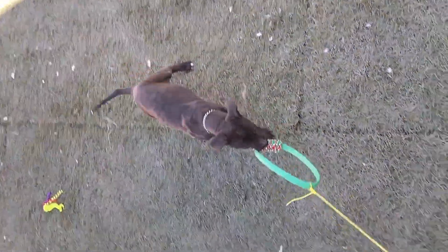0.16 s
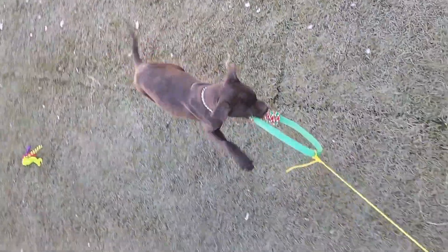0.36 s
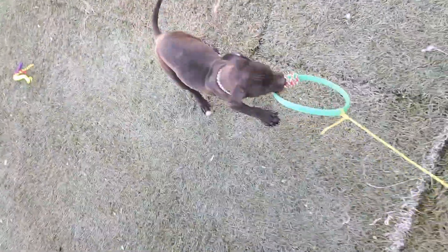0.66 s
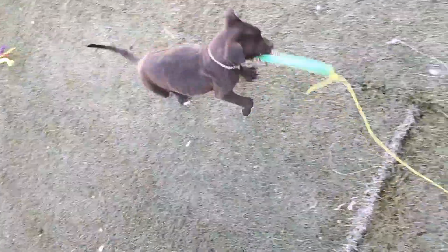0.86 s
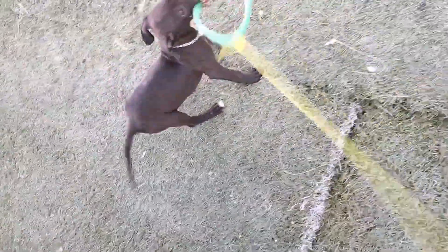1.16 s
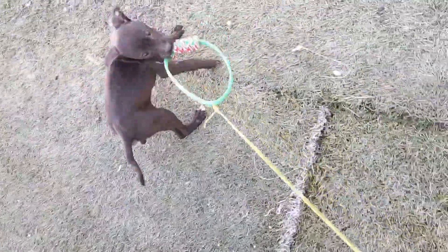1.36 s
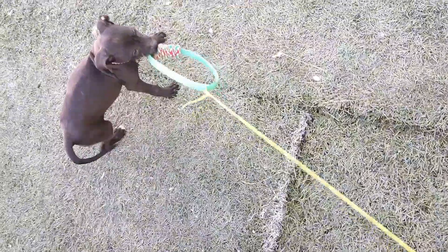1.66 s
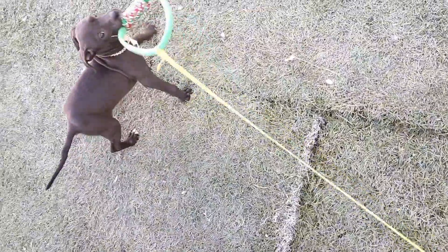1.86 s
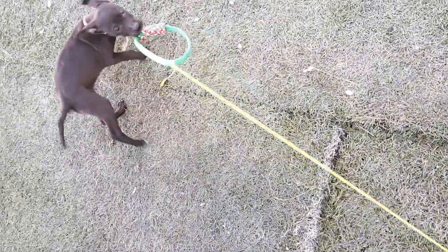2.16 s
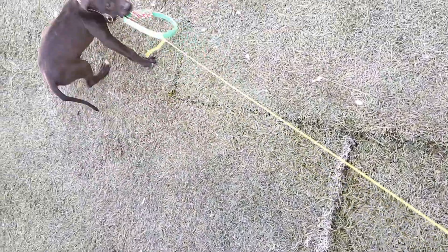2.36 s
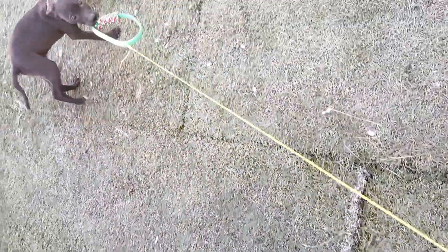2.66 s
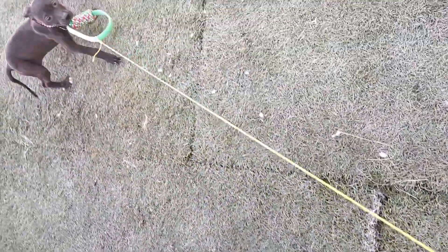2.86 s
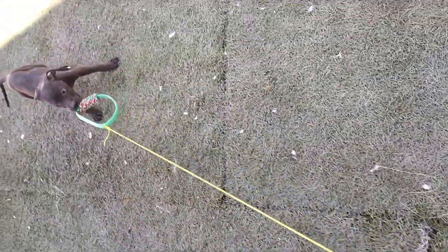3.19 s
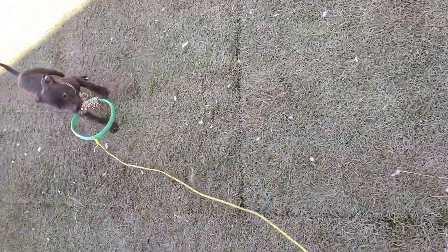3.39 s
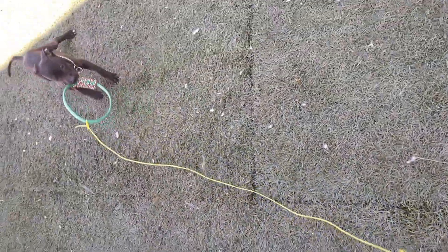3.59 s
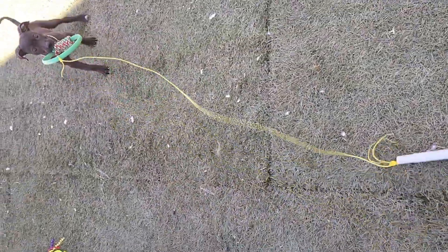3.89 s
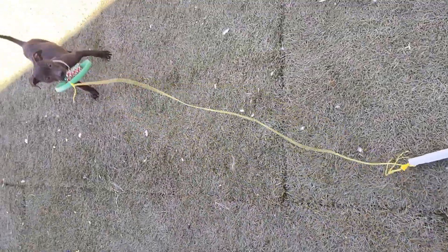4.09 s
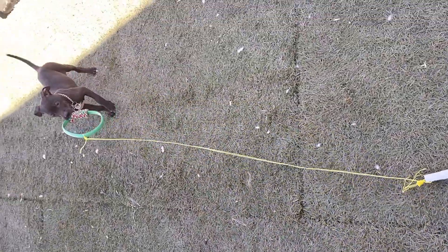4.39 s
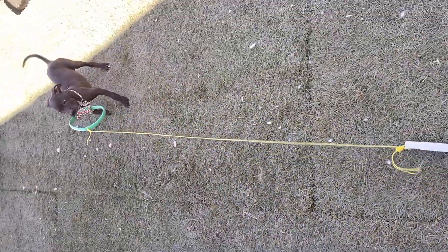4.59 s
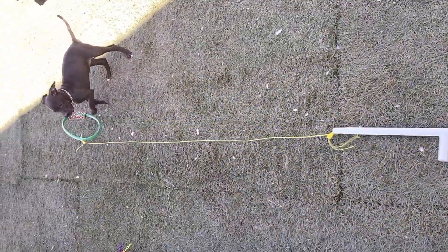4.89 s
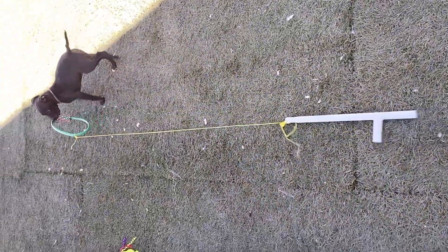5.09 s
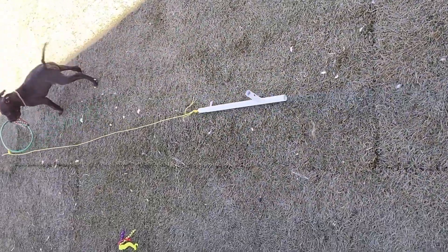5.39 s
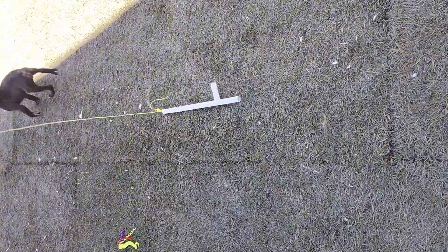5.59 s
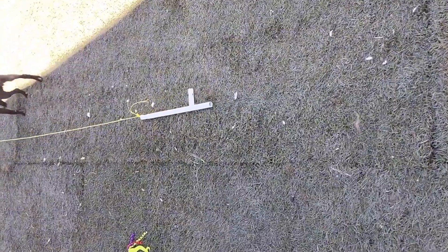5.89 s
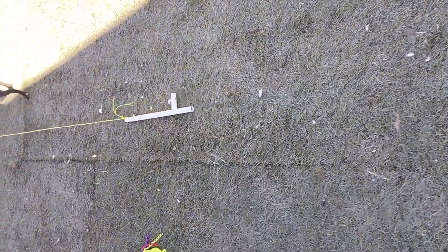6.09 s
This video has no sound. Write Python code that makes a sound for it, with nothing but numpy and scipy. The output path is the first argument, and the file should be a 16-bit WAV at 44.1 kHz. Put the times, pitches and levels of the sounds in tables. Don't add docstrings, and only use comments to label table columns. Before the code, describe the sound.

A dog scuffs dry turf over far traffic; a hollow handle drops with ringing clinks, then scrapes lightly along while a motor rises and nears.

```python
import sys
import numpy as np
from scipy import signal
from scipy.fft import rfft, irfft, next_fast_len
from scipy.io import wavfile
from scipy.ndimage import uniform_filter1d, map_coordinates

SR = 44100
rng = np.random.default_rng(int(sys.argv[2]) if len(sys.argv) > 2 else 0)


def gain_from_db(level_db):
    decades = np.asarray(level_db, float) / 20
    return 10 ** decades


def generate_wav(signal):
    frames = np.transpose(np.atleast_2d(signal))
    scaled = np.clip(frames, -1, 1) * 32767
    pcm = np.round(scaled).astype(np.int16)
    wavfile.write(sys.argv[1], SR, pcm)


N = 275623

# [f/Hz, likeness (1 = same)]
ALIKE = [(60, 0.98), (130, 1), (290, 0.78), (640, 0.36), (1410, -0.063), (3100, -0.027), (6820, -0.27),
         (15000, -1.5)]
# [f/Hz, level/dB per Hz]
JINGLE = [(8600, -59), (9000, -6.5), (11200, -3), (11650, -16.5), (12100, -5.5), (14500, -7), (15700, -12)]
RATTLE_DB = 2.5


def unit(x):
    return x / np.sqrt(np.mean(x ** 2) + 1e-20)


def along(points, hz):
    f, v = np.transpose(points)
    return np.interp(np.log(hz + 1), np.log(f + 1), v)


def curves(rows):
    s, *cols = np.transpose(rows)
    return [np.interp(np.arange(N) / SR, s, c) for c in cols]


def sounding(rows, fade=0.094):
    t = np.arange(N) / SR
    outside = np.minimum(t - rows[0][0], rows[-1][0] - t)
    return np.clip(1 + outside / fade, 0, 1)


def wobble(rate):
    knots = rng.standard_normal(int(N * rate / SR) + 4)
    return map_coordinates(knots, [np.arange(N) * rate / SR])


def filtered(x, response):
    m = next_fast_len(N + SR // 2)
    return irfft(rfft(x, m) * response(np.fft.rfftfreq(m, 1 / SR)), m)[..., :N]


def placed(x, pan_db):
    return np.array([x * gain_from_db(pan_db / 2), x * gain_from_db(-pan_db / 2)])


def rush(spectrum, alike, patchy_db):
    z = signal.stft(rng.standard_normal((2, N)), nperseg=512)[2]
    patches = uniform_filter1d(rng.standard_normal(z.shape[1:]), size=6, axis=0)
    patches = uniform_filter1d(patches, size=12, axis=1)
    pair = signal.istft(z * gain_from_db(patchy_db * unit(patches)), nperseg=512)[1][:, :N]

    def middle_and_side(hz):
        turn = np.arccos(np.clip(along(alike, hz), -1, 1)) / 2
        return gain_from_db(along(spectrum, hz)) * [np.cos(turn), np.sin(turn)]

    mid, side = filtered(pair, middle_and_side)
    return unit(np.array([mid + side, mid - side]))


def tone(hz, db, shake, flutter_db):
    phase = 2 * np.pi * (np.cumsum(hz) / SR + rng.random()) + shake * wobble(12)
    ears = np.array([wobble(4), wobble(4)]) * np.mean(hz) / 650
    return np.sqrt(2) * gain_from_db(db + flutter_db * wobble(9)) * np.sin(phase + ears)


def strokes(rows):
    s, db, rise, fall = np.transpose(rows)[..., None]
    late = np.arange(N) / SR - s
    away = np.maximum(-late / abs(rise), late / abs(fall))
    return np.max(db - 18 * away ** 1.46, axis=0)


def yard(x):
    # [f/Hz, time/s]
    echo_t60 = [(200, 0.24), (3000, 1), (12000, 0.047)]
    hz, t, z = signal.stft(rng.standard_normal((2, SR // 2)), SR, nperseg=256)
    tail = signal.istft(z * gain_from_db(-60 * t / along(echo_t60, hz)[:, None]), SR, nperseg=256)[1]
    late = np.pad(x, ((0, 0), (300, 0)))
    return signal.fftconvolve(late, tail / np.linalg.norm(tail[0]), axes=1)[:, :N]


def hiss():
    # [f/Hz, level/dB per Hz]
    hiss_colour = [(3000, -30), (5000, -1), (7800, -2), (8500, -5), (15700, -4)]
    return gain_from_db(-88.5) * rush(hiss_colour, [(5000, 0)], patchy_db=1.5)


def exhaust(hz, db, overtone_db):
    base = tone(hz, db, shake=.15, flutter_db=.8)
    return base + tone(2 * hz, db + overtone_db, shake=.3, flutter_db=2.5)


def traffic():
    # [t/s, f/Hz, level/dB]
    passing = [
        (1.45, 123.2, -55.5),
        (1.638, 125.4, -35),
        (2.024, 136.3, -40),
        (2.188, 138.3, -33.5),
        (2.36, 131, -33.5),
        (2.52, 130.6, -39.5),
        (2.916, 127.9, -37.5),
        (3.1, 129, -58.5),
    ]
    # [t/s, length/s, first f/Hz, last f/Hz, level/dB]
    drone_rows = [(-.3, .82, 65, 65.4, -32), (.42, .42, 65.4, 64, -41), (.66, .2, 76, 79, -38),
                  (.85, .25, 67.5, 67, -35), (1.85, 1.1, 64, 65.6, -41), (1.05, .4, 79, 77, -42),
                  (1.28, 1.66, 53.2, 53, -35.5), (2.9, .68, 53.5, 54, -40), (3.56, .78, 54.5, 55.9, -44),
                  (4.3, 1.1, 55.8, 55.9, -42), (5.45, .9, 55, 53, -43), (.2, .3, 149, 156, -49),
                  (.5, .66, 159, 163.5, -40.5), (.9, .17, 101, 104, -37), (1.0, .28, 116, 118, -38),
                  (.03, .4, 127, 130, -46), (1.45, .3, 76, 77, -42), (1.95, .45, 85.5, 85.6, -44),
                  (3.15, .25, 114, 116, -43), (3.52, .28, 116, 117, -39), (1.1, .22, 55, 54, -40),
                  (4.2, .25, 139, 143, -42), (2.95, .3, 66, 68, -44), (.08, .45, 198, 196, -52),
                  (2.15, 1.2, 228, 217, -54), (3.7, .17, 140, 146, -40), (1.055, .05, 660, 570, -50)]
    # [t/s, level/dB]
    road = [(0.0, -50.5), (1.1, -50), (3.24, -52.5), (4.09, -51.5), (5.2, -48.5), (6.25, -48.5)]
    # [f/Hz, level/dB per Hz]
    rumble_colour = [(15, -51), (28, 10), (40, 18.5), (70, 13), (110, 17.5), (160, 11), (220, 5.5),
                     (350, -19.5), (600, -52.5)]
    # [f/Hz, level/dB per Hz]
    roar_colour = [(150, -11), (250, -6), (340, -11), (430, -8), (560, -10.5), (720, -7.5), (1200, -11.5),
                   (1800, -18), (2500, -28), (3500, -40.5), (5000, -49.5), (8000, -66), (12000, -120)]
    # [f/Hz, left minus right/dB]
    lean_points = [(40, 1), (70, -0.5), (150, -1.4), (380, 1), (950, -2.5), (2400, -0.5), (6000, 3.5)]

    rev_hz, rev_db = curves(passing)
    overtone_db = -19.5 + .8 * (rev_hz - 137)
    drones = sounding(passing) * exhaust(rev_hz, rev_db, overtone_db)
    for s, length, first_hz, last_hz, db in drone_rows:
        done = np.clip((np.arange(N) / SR - s) / length, 0, 1)
        swell = np.abs(np.sin(np.pi * done)) ** 0.47 * (done < 1)
        hz = first_hz + (last_hz - first_hz) * done
        drones = drones + swell * exhaust(hz, db + 0.1, overtone_db=-32)

    road_db = curves(road)[0]
    rumble = gain_from_db(road_db + 10.5 + 0.14 * wobble(4.7)) * rush(rumble_colour, ALIKE, patchy_db=2.5)
    roar = gain_from_db(road_db + 3.5 + 0.47 * wobble(6.4)) * rush(roar_colour, ALIKE, patchy_db=0.5)

    def lean(hz):
        return gain_from_db(along(lean_points, hz) / 2 * np.array([[1], [-1]]))

    return filtered(drones + rumble + roar, lean)


def paw_side(db):
    return np.clip(-.6 * (db + 87.5), -12, 4)


def paws():
    # [peak t/s, level/dB, rise/s, fall/s]
    scuffs = [(0.127, -77.5, 0.024, 0.017), (.384, -80, 0.18, 0.19), (0.556, -72.5, 0.036, 0.097),
              (.67, -76.5, .08, 0.079), (.86, -79.5, 0.24, 0.13), (.95, -74.5, 0.085, .1),
              (1.015, -69, 0.21, 0.12), (1.104, -74, 0.01, 0.098), (1.2, -82, 0.11, 0.29),
              (1.64, -82, 0.05, 0.066), (1.975, -82, 0.017, .06), (2.129, -82.5, 0.043, 0.14),
              (2.22, -82, 0.059, 0.029), (2.35, -87, 0.065, 0.015), (2.438, -85, .02, 0.47),
              (2.886, -90.5, 0.011, .1), (3.122, -85.5, 0.076, 0.034), (3.375, -78.5, 0.045, 0.034),
              (3.47, -89.5, 0.051, .04), (2.69, -86, 0.064, 0.043), (4.67, -73.5, 0.057, 0.054),
              (4.85, -82.5, 0.3, 0.023), (5.854, -74, .18, 0.25), (6.2, -76, 0.34, 0.34)]
    # [f/Hz, level/dB per Hz]
    near_colour = [(900, -27), (1800, -1), (2500, -6), (3200, -16), (4200, -9.5), (5200, -19.5),
                   (6800, -16.5), (8500, -21), (10000, -21), (15600, -32)]
    # [f/Hz, level/dB per Hz]
    far_colour = [(3500, -25), (5500, -8), (7000, 1.5), (7900, 1), (8500, -10), (15600, -17.5)]
    far_s = (1.5, 3.6)
    out = 0
    for near, colour, lift_db in [(True, near_colour, 13), (False, far_colour, 5)]:
        db = strokes([row for row in scuffs if (far_s[0] < row[0] < far_s[1]) != near])
        grains = gain_from_db(1.3 * wobble(300) + 1.4 * wobble(35))
        rustle = unit(grains * rush(colour, [(3000, 0.16)], patchy_db=-1.0))
        out = out + placed(gain_from_db(db + lift_db), paw_side(db)) * rustle
    return out


def snaps():
    # [t/s, peak level/dB, left minus right/dB]
    snap_rows = [(1.5613, -77, 5), (1.635, -64, 5), (1.9704, -68, 4), (2.0287, -73, 2), (2.0655, -69, 3.5),
                 (2.1104, -70, 7.5), (2.1337, -68, 6), (2.3198, -71, 1), (2.4344, -68.5, 5),
                 (2.4952, -65, 7.5), (2.5406, -66.5, 3), (2.6449, -72.5, 4.5), (2.8868, -74, 3.5),
                 (3.1148, -73, 7), (3.3449, -73, -10.5), (3.454, -77, 3), (3.689, -51, -9.5),
                 (4.6503, -57, -6.5), (4.7227, -55, -10), (4.7607, -57.5, -8.5), (5.3, -61, 8),
                 (5.3307, -58, 5), (5.515, -67, -2), (5.6075, -67, 6)]
    # [f/Hz, level/dB per Hz]
    snap_colour = [(2500, -28), (5000, -2.5), (7500, 5), (10000, -7.5), (15700, -10.5)]
    out, t = np.zeros((2, N)), np.arange(SR // 30) / SR
    bright = unit(filtered(rng.standard_normal(N), lambda hz: gain_from_db(along(snap_colour, hz))))
    for s, db, pan_db in snap_rows:
        at = round(s * SR)
        snap = gain_from_db(db - 7 - 60 * t / .03) * bright[at:at + len(t)]
        out[:, at:at + len(t)] += placed(snap, pan_db)
    return out


def tag():
    # [t/s, length/s, peak level/dB, f/Hz]
    shakes = [(0.155, 0.034, -54, 11000), (0.45, 0.016, -50.5, 10950), (0.547, .08, -64, 11000),
              (.635, 0.065, -50, 10900), (0.74, 0.036, -68, 11000), (.997, .02, -59, 10900),
              (1.068, 0.13, -53, 10980), (2.314, 0.038, -65.5, 11000), (2.553, 0.069, -76, 10950),
              (2.629, 0.1, -59, 10900), (2.749, 0.066, -73, 10880), (2.972, 0.046, -71, 10930),
              (3.019, 0.069, -61.5, 10970), (3.221, 0.015, -58, 10800), (3.33, 0.065, -66, 11050),
              (3.546, 0.049, -58, 10930)]
    tick_gap_s, scatter_db, scatter_hz = 0.018, 3, 90
    out, t = np.zeros((2, N + SR)), np.arange(SR // 10) / SR
    for s, length, db, hz in shakes:
        for k, (slip, size, tune) in enumerate(rng.standard_normal((12, 3))):
            late = tick_gap_s * (k + .2 * slip * (k > 0))
            pitch = hz + scatter_hz * tune
            done = min((late + .006) / (length + .006), 1)
            swell = np.sqrt(np.clip(np.sin(np.pi * done), 0, 1))
            ring = np.sin(2 * np.pi * pitch * t) + .4 * np.sin(2 * np.pi * (pitch + 280) * t)
            ring = ring * swell * gain_from_db(db - 5.5 + scatter_db * size - 60 * t / 0.034)
            ring = ring * (1 - np.exp(-t / 0.0011))
            side_db = -6 if s < 1.5 else 3
            out[:, round((s + late) * SR):][:, :len(t)] += placed(ring, side_db)
    return out[:, :N]


def knocks():
    # [t/s, peak level/dB]
    blows = [
        (3.6933, -29),
        (3.7272, -30.5),
    ]
    out, t = np.zeros(N), np.arange(SR // 10) / SR
    for s, db in blows:
        puff = signal.lfilter([.3], [1, -.7], rng.standard_normal(len(t))) * gain_from_db(-60 * t / 0.008)
        body = np.sin(2 * np.pi * 850 * t) * gain_from_db(-60 * t / 0.0086)
        body = body + 2.0 * np.sin(2 * np.pi * 380 * t) * gain_from_db(-60 * t / 0.008)
        out[round(s * SR):][:len(t)] += gain_from_db(db) * (body + 2.2 * puff) * (1 - np.exp(-t / .0003))
    return placed(out, -1.4)


def jingle(spectrum):
    modes = gain_from_db(4.5 * rng.standard_normal(SR // 60))
    noise = rush(spectrum, [(9000, 0.26)], patchy_db=2.5)
    return unit(filtered(noise, lambda hz: modes[(hz // 31).astype(int)]))


def clinks():
    # [t/s, peak level/dB, big links/dB, middle links/dB, left minus right/dB]
    contacts = [(3.389, -58, -20, -28, -14.5), (3.694, -39, -4, -15, -13), (3.7234, -31, -8, -16, -6.5),
                (3.821, -40.5, -14, -22, -14), (3.839, -36.5, -9.5, -15, 0.5), (3.8745, -41.5, -9, -12, -6),
                (3.972, -37, -11, -15.5, -15), (4.0481, -37, -14, -23, -5.5),
                (4.1716, -51.5, -23, -22, -14.5), (4.189, -55, -25, -28, -8), (4.649, -52.5, -15, -7, -4),
                (4.761, -54, -24, -20, -14), (4.8605, -55.5, -15, -24, -28), (5.017, -49.5, -18, -20, 6),
                (5.514, -53.5, -15, -16, 9.5)]
    # [f/Hz, level/dB, time to die by 60 dB/s (0.22 at most is used)]
    link_modes = [(3360, -4.5, 0.4), (3360, -7.5, 0.25), (3540, -6, 0.22), (3747, -14.5, 0.25),
                  (3800, -4, 0.14), (4120, -9, 0.22), (4570, -7.5, 0.19), (4920, -7, 0.14),
                  (5690, -5, 0.12), (6000, -4.5, 0.25), (6130, -6.5, 0.19), (6200, -11, 0.2),
                  (6330, -23, 0.47), (6500, -11, 0.11), (6595, -30, 0.3), (7100, -24, 0.68),
                  (7203, -26, 0.27), (7600, -16.5, 0.61), (7900, -16.5, 5.0), (7800, -18, 0.24),
                  (8310, -14.5, 0.11), (8880, -11.5, 0.15), (9130, -12, 0.28), (9400, -21, 5.0),
                  (9300, -11.5, 0.13), (9959, -4.5, 0.054)]
    out, t = np.zeros((2, N + SR)), np.arange(SR // 3) / SR
    small = np.pad(jingle(JINGLE), ((0, 0), (0, SR)))
    hz, level, t60 = np.repeat(np.transpose(link_modes), repeats=3, axis=1)[..., None]
    for s, db, big_db, middle_db, pan_db in contacts:
        at, chance = round(s * SR), rng.standard_normal((4, len(hz), 1))
        struck = np.where(hz < 5200, big_db + 5.0, np.where(hz < 6700, middle_db + 14, 0))
        size = gain_from_db(level + struck + 2.8 * chance[0] - 2 - 60 * t / np.minimum(t60, .22))
        turns = 2 * np.pi * hz * (1 + 0.0027 * chance[1]) * t
        ring = np.array([np.sum(size * np.sin(turns + 2.15 * ear), axis=0) for ear in chance[2:]])
        ring = ring * gain_from_db(RATTLE_DB * wobble(70)[:len(t)])
        shake = gain_from_db(-2.5 - 60 * t / 0.17) * small[:, at:at + len(t)] * gain_from_db([[-2], [2]])
        bright = np.diff(rng.standard_normal((2, len(t) + 1)))
        crack = (db > -41) * 1.2 * gain_from_db(-60 * t / 0.025) * bright
        start = placed(1 - np.exp(-t / 0.0015), pan_db)
        out[:, at:at + len(t)] += gain_from_db(db - 18.5) * (ring + shake + crack) * start
    return out[:, :N]


def rings():
    # [t/s, f/Hz, level/dB, time to die by 60 dB/s, left minus right/dB]
    ring_rows = [(3.693, 3520, -58, 0.19, -14), (3.693, 5835, -62, .1, 9), (3.726, 6136, -63, 0.45, -2),
                 (3.726, 4161, -64, 0.3, 8), (3.835, 5706, -51, .2, 5), (3.839, 5840, -53, .1, -1),
                 (3.839, 3875, -59, .12, -9), (3.839, 7918, -61, 0.24, 9), (3.825, 9528, -53, 0.22, -20),
                 (3.877, 3343, -66, 0.28, 2), (3.877, 4145, -65, 0.45, -17), (3.973, 3343, -56, .22, -11),
                 (3.973, 3526, -62, .3, -10), (4.047, 3283, -63, 0.5, -1), (4.047, 9183, -67, .5, -26),
                 (4.172, 9183, -67, .35, -25), (4.723, 6120, -72, .5, -10), (4.816, 6120, -70, .5, -2),
                 (4.851, 3843, -63.5, .35, -20), (5.016, 3725, -67, 0.32, -8), (5.016, 7908, -64, .5, 1),
                 (5.016, 3488, -73, 0.47, -3), (5.016, 5690, -62, .3, 2), (5.021, 5850, -67, .5, 4),
                 (5.17, 5528, -68, 0.54, 1), (5.171, 3843, -66, 0.56, 5.5), (5.161, 4565, -65, .8, 15),
                 (5.15, 4941, -70, .8, 4.5), (5.2, 5684, -66, .5, 1), (5.21, 5932, -65, .4, 1.5),
                 (5.19, 7536, -60, 0.6, 8.5), (5.2, 10239, -65, .4, -11), (5.515, 3886, -71, 0.48, 1),
                 (5.515, 5819, -71.5, .5, 3.5), (5.59, 5851, -68.5, 0.51, 4), (5.607, 6013, -72, .4, -0.5),
                 (5.56, 6373, -73, .6, 9)]
    drag_from_s, slack_s = 4.5, 5.29
    out, t = np.zeros((2, N + SR)), np.arange(SR // 3) / SR
    for s, hz, db, t60, pan_db in ring_rows:
        swell = 1 - np.exp(-t / (.003 if s < drag_from_s else .02))
        damped = gain_from_db(-600 * np.maximum(t + s - slack_s, 0) * (s < slack_s))
        damped = damped * np.cos(np.pi / 2 * t / t[-1])
        turns = 2 * np.pi * hz * t + .6 * wobble(40)[:len(t)]
        size = gain_from_db(db - 60 * t / t60 + 1.4 * RATTLE_DB * wobble(45)[:len(t)])
        ring = size * np.sin(turns) * swell * damped
        out[:, round(s * SR):][:, :len(t)] += placed(ring * gain_from_db(abs(pan_db) / -2 + 2.5), pan_db)
    return out[:, :N]


def drag():
    # [peak t/s, level/dB, rise/s, fall/s]
    tugs = [
        (4.688, -75, 0.28, 0.33),
        (4.89, -63, 0.1, 0.23),
        (5.03, -56.5, 0.037, 0.087),
        (5.09, -67, 0.048, 0.087),
        (5.2, -59.5, 0.076, 0.1),
        (5.26, -61.5, 0.11, 0.084),
        (5.53, -68, 0.026, .15),
        (5.62, -71.5, 0.13, 0.2),
    ]
    # [f/Hz, level/dB]
    dragged_modes = [(3838, -79), (4145, -86), (4590, -84.5), (4950, -84.5), (5308, -102), (5529, -86.5),
                     (5696, -81), (5852, -72), (6105, -78), (6379, -79.5), (6643, -106), (6961, -90),
                     (7305, -84), (7590, -79), (7913, -79.5), (8306, -101)]
    # [peak t/s, level/dB, rise/s, fall/s]
    shivers = [(4.67, -73, 0.18, .2), (4.78, -72, .1, 0.16), (4.91, -67.5, 0.14, 0.13),
               (5.06, -66.5, 0.13, 0.12), (5.15, -70.5, 0.091, .1), (5.24, -65, 0.15, 0.086),
               (5.4, -83, 0.11, .15), (5.53, -77.5, 0.045, 0.24), (5.68, -84.5, .15, .15)]
    # [peak t/s, level/dB, rise/s, fall/s]
    swings = [(3.98, -68, 0.022, .065), (4.056, -63, 0.033, 0.074), (4.192, -70.5, 0.087, 0.12),
              (4.56, -75.5, 0.12, .6), (4.89, -71, 0.4, 0.1694), (5.034, -77.5, .1, 1),
              (5.75, -81.5, 1.7, 0.069)]
    # [f/Hz, level/dB per Hz]
    loose_colour = [(8750, -50), (9050, -2), (9300, -0.5), (9650, -11.5), (10400, -15.5), (10700, -50)]
    # [f/Hz, level/dB per Hz]
    taut_colour = [(9300, -42), (9800, 3), (10200, 3), (10600, -8.5), (11200, -10.5), (11600, -45)]
    taut_s = (4.64, 4.86)
    # [peak t/s, level/dB, rise/s, fall/s]
    hums = [
        (4.85, -80, .1, .2),
        (5.23, -59.5, 0.12, 0.25),
        (5.6, -74.5, 0.17, .3),
    ]

    t = np.arange(SR // 4) / SR
    ringing = np.zeros((2, N))
    for hz, db in dragged_modes:
        taps = (rng.random((2, N)) < 120 / SR) * rng.standard_normal((2, N))
        mode = gain_from_db(-60 * t / 0.15) * np.sin(2 * np.pi * hz * t)
        ringing += gain_from_db(db) * unit(signal.fftconvolve(taps, mode[None], axes=1)[:, :N])
    links = placed(gain_from_db(strokes(tugs)), -1) * unit(ringing)

    grains = gain_from_db(1.5 * wobble(120) + 1.3 * wobble(25))
    small = gain_from_db(strokes(shivers)) * unit(grains * jingle(JINGLE))
    taut = np.interp(np.arange(N) / SR, taut_s, [0, np.pi / 2])
    rattle = np.cos(taut) * jingle(loose_colour) + np.sin(taut) * jingle(taut_colour)
    clasp = gain_from_db(strokes(swings) - 2.0) * unit(grains * rattle)
    pipe = tone(np.full(N, 1943.), strokes(hums), shake=0.38, flutter_db=1.0)
    return links + (small + clasp) * placed(np.ones(N), -13.5) + pipe


def boom_db(hz):
    # [f/Hz, width/Hz, level/dB]
    booms = [(65.1, 4.7, -1), (80.2, 8, 0), (87.4, 4.1, -4), (99.4, 9.8, 1.5), (133.8, 13.7, 2.5),
             (152.5, 14.4, -1), (174.5, 9.1, -8), (208, 8.3, -13), (213.2, 6.7, -10), (237.4, 6.5, -7.5),
             (274, 88, -15.5), (417, 25, -22), (468, 31, -10.5)]
    power = sum(gain_from_db(db) ** 2 / (1 + (2 * (hz - c) / w) ** 4) for c, w, db in booms)
    return 10 * np.log10(power + 0.00081)


def engine():
    # [t/s, cycle rate f/Hz, nearness/dB]
    climb = [(3.55, 18.2, -24), (3.68, 18.2, -12.5), (3.8, 18.7, -8), (3.92, 19.6, -9.5),
             (4.15, 19.7, -9.5), (4.3, 20.9, -8.5), (4.45, 21.5, -9.5), (4.7, 21.4, -7.5),
             (5.0, 23.9, -4.5), (5.3, 24.7, -4), (5.65, 26.4, -3.5), (5.85, 27.7, -2.5), (6.05, 28.4, -1),
             (6.25, 30.5, -0.5)]
    # [multiple of the cycle rate, level on a boom/dB]
    strong = [(3, -27), (4, -36), (5, -26), (6, -32.5), (8, -31), (11, -32.5), (14, -31), (16, -32)]
    # [multiple of the cycle rate, level/dB]
    weak = [(2, -6.5), (7, -2), (9, -13.5), (10, -5.5), (12, -13.5), (13, -10), (15, -8.5), (17, -9.5),
            (18, -10.5), (19, -12), (20, -14), (21, -15.5), (22, -13), (23, -12), (24, -9)]
    # [f/Hz, level/dB per Hz]
    intake_colour = [(250, -16), (500, 8.5), (1500, -4), (3000, -13), (5000, -25.5), (7800, -27),
                     (8600, -45), (15700, -42.5)]
    cycle_hz, near_db = curves(climb)
    lines = 0
    for k, db in strong:
        line_db = db + near_db + boom_db(k * cycle_hz)
        lines = lines + tone(k * cycle_hz, line_db, shake=0.046 * k, flutter_db=0.15 * k)
    for k, db in weak:
        line_db = -48 + 1.5 * near_db + db + 3 * wobble(4)
        lines = lines + tone(k * cycle_hz, line_db, shake=.3 + .06 * k, flutter_db=3.5)
    intake = gain_from_db(-42.5 + 2.68 * near_db) * rush(intake_colour, ALIKE, patchy_db=1.5)
    firing = np.sin(2 * np.pi * np.cumsum(3 * cycle_hz) / SR)
    cycle = np.sin(2 * np.pi * np.cumsum(cycle_hz) / SR)
    growl = 1 + 0.19 * (firing + cycle)
    return sounding(climb) * (lines + intake * growl)


def scene():
    near = tag() + knocks() + clinks() + rings() + drag()
    near = near + gain_from_db(-16) * yard(near)
    return hiss() + traffic() + paws() + snaps() + near + engine()


def roll_off(x):
    return signal.sosfilt(signal.butter(12, 15730, fs=SR, output="sos"), x)


def record(dry):
    fade = np.clip(np.arange(N)[::-1] / (.005 * SR), 0, 1)
    mix = filtered(dry, lambda hz: hz < 15760) * fade
    return roll_off(mix)


dry = scene()
out = record(dry)
generate_wav(out)
```